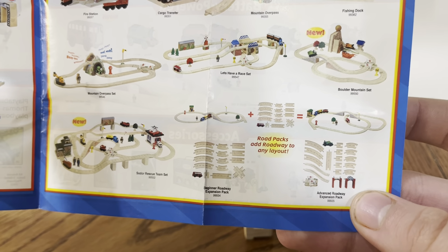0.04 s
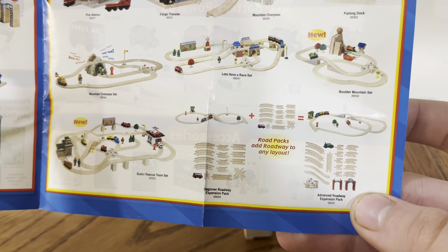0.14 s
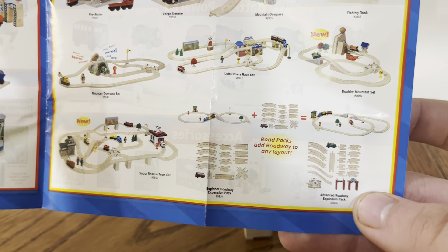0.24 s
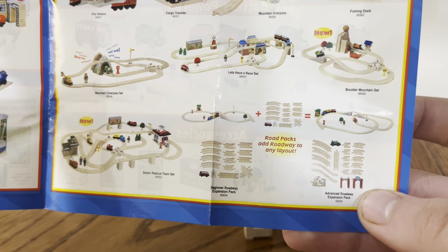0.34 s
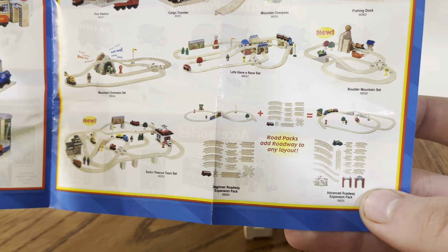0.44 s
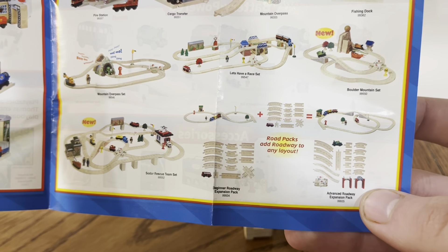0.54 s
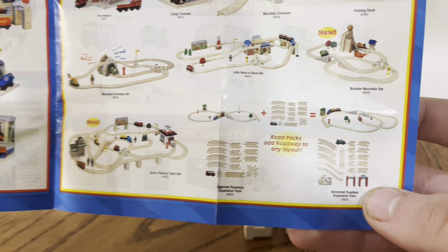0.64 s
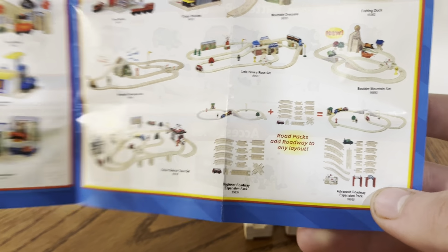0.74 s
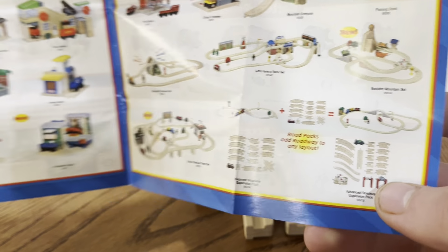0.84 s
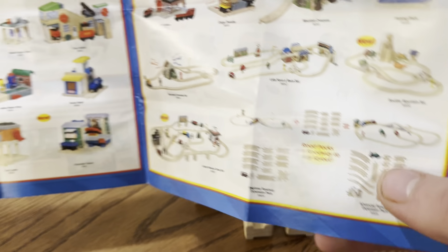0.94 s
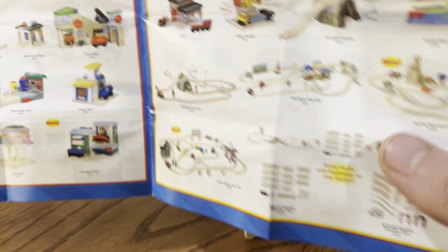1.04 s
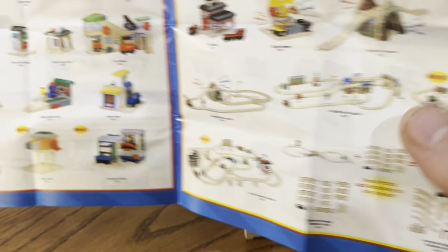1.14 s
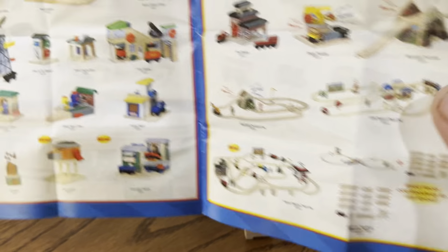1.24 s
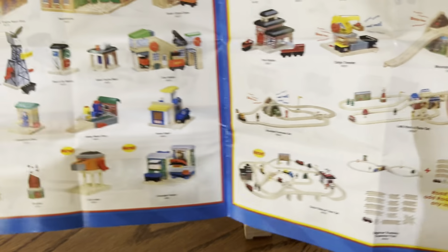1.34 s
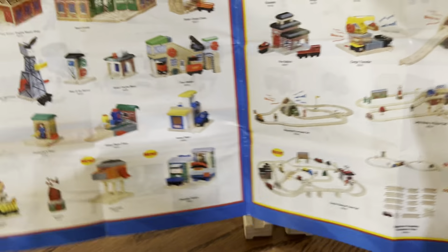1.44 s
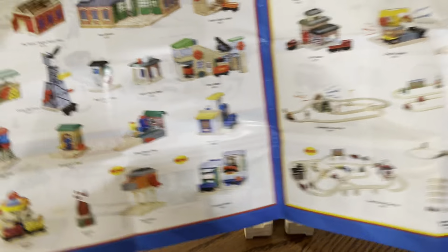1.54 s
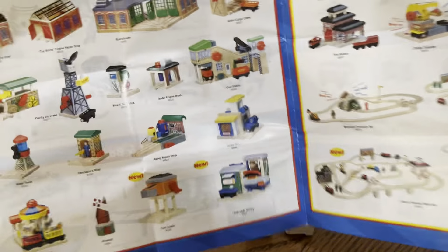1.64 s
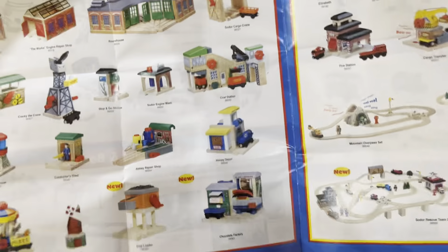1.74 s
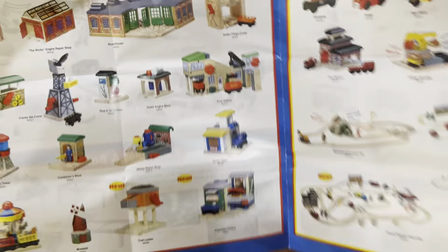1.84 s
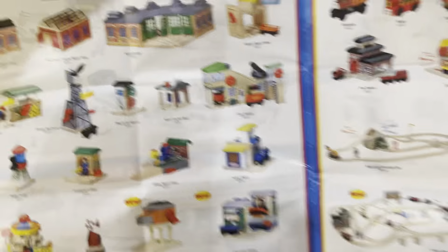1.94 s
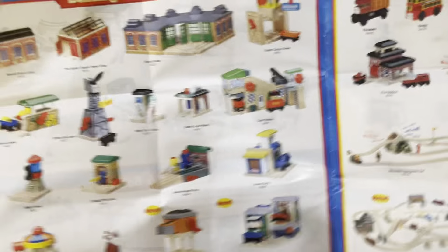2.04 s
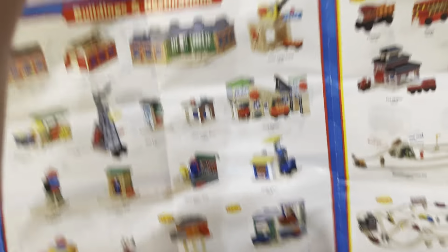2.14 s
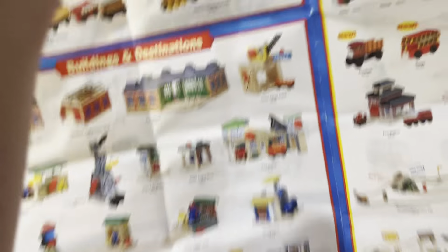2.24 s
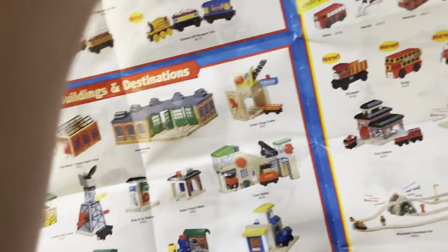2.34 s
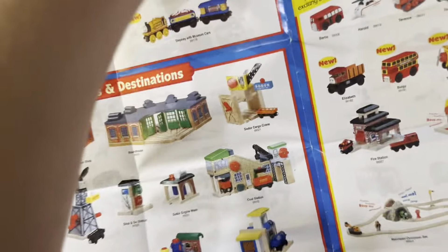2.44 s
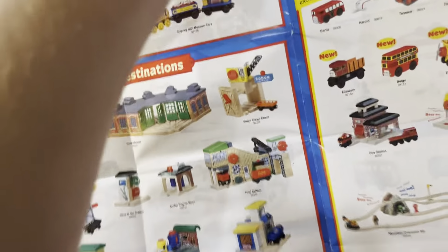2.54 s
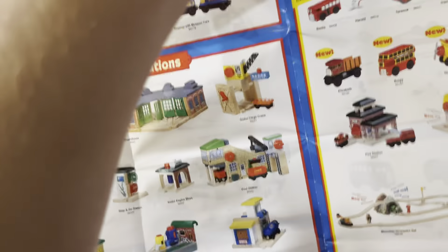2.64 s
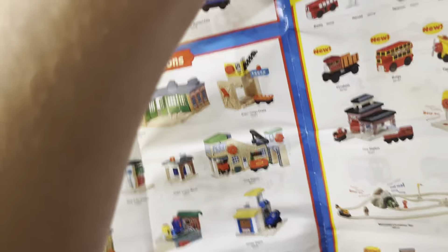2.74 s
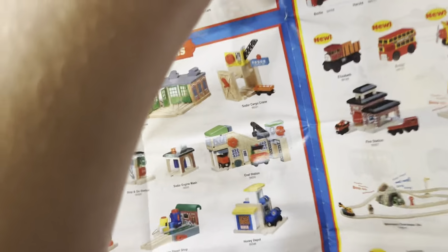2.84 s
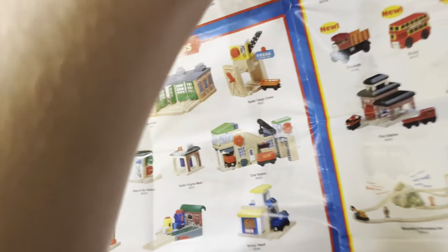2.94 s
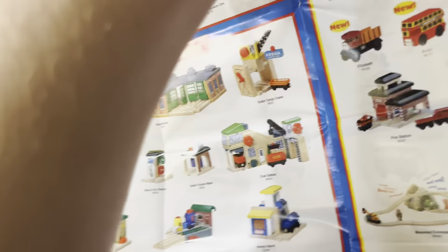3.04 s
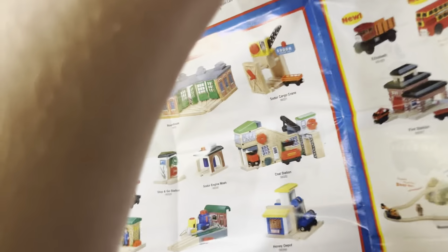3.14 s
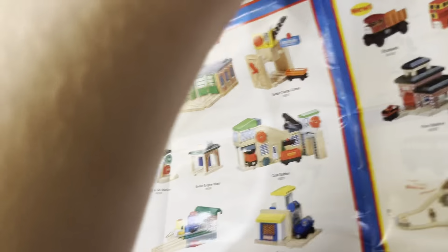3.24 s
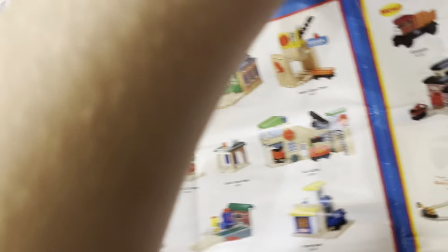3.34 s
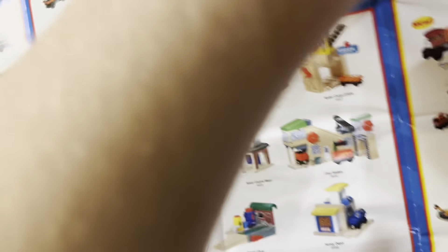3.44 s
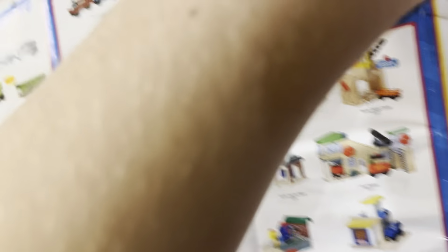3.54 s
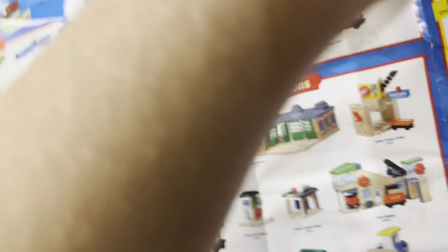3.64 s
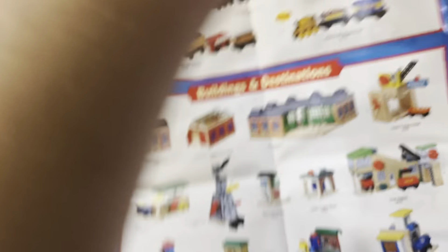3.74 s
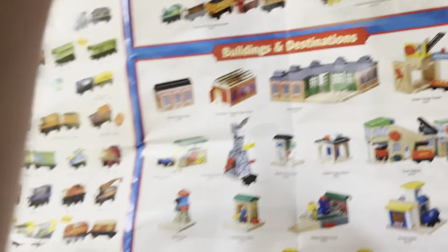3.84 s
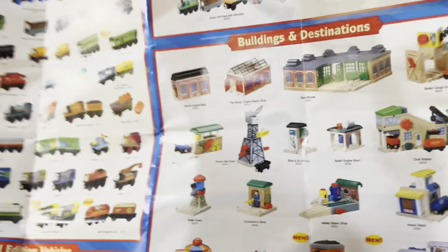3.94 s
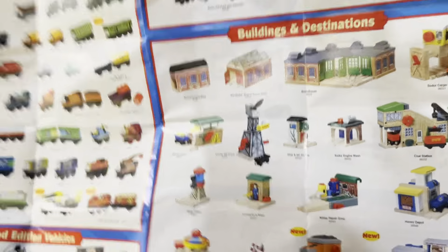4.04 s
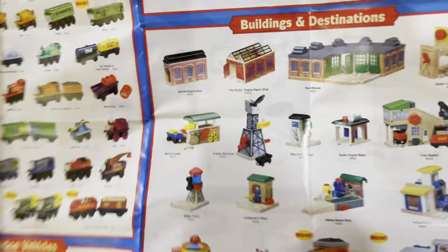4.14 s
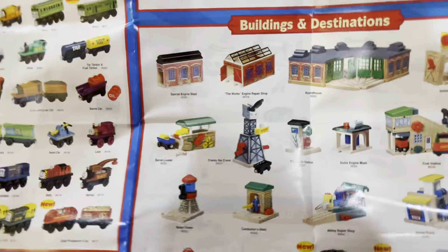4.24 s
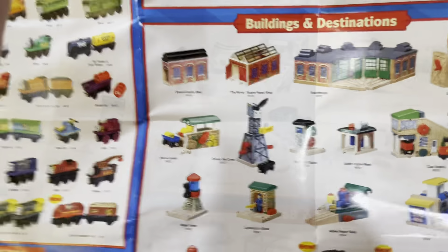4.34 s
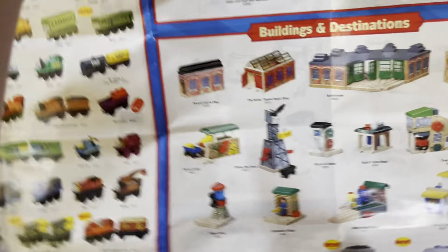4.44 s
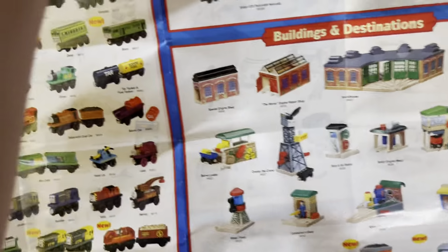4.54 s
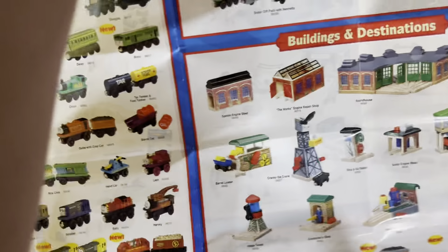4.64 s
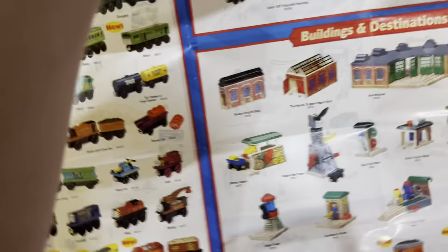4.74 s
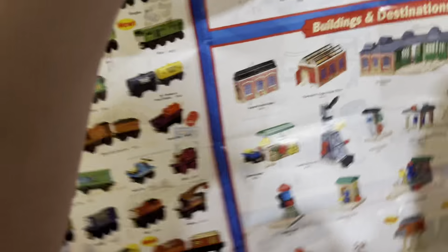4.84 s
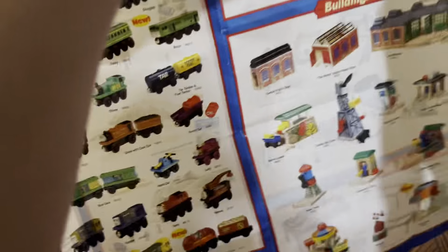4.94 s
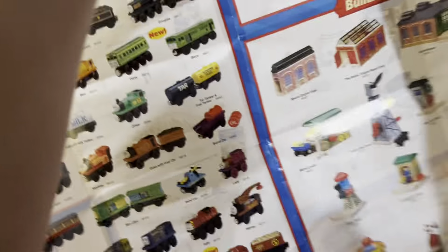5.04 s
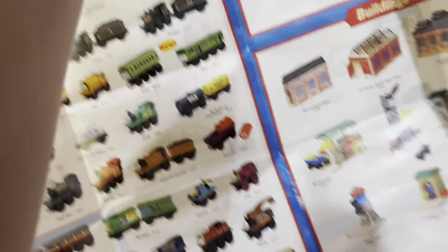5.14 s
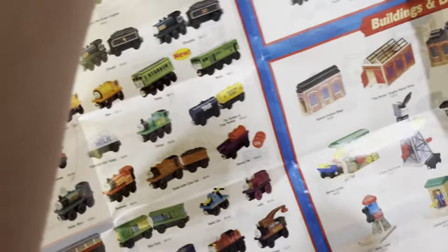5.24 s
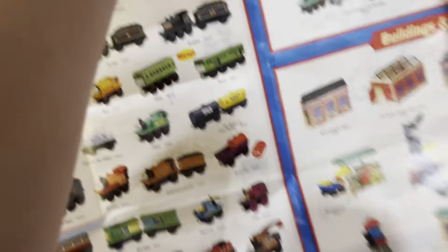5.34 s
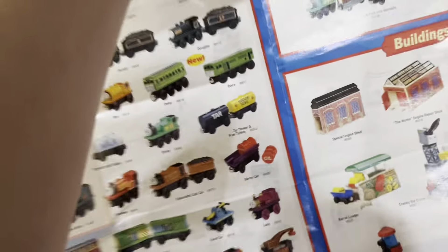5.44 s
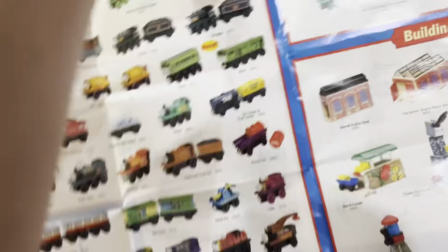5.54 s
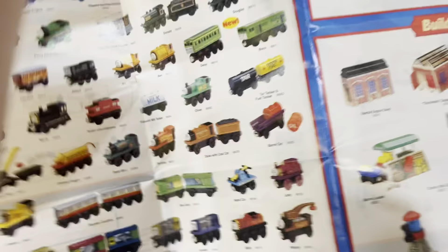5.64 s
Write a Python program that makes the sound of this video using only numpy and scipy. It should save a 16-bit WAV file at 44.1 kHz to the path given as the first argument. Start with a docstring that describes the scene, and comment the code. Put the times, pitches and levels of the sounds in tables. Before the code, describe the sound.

A tiny thin squeak of paper at the very start dies at once, leaving faint room tone for over half a second. Then a large glossy folded sheet is moved by hand: rustling, crinkling, sharp crease snaps, dull hollow pops and low air-pushing flaps continue irregularly to the end. Close stereo microphone, small quiet room, very little reverberation.

```python
"""A large folded leaflet of glossy paper is opened out and handled close by in a quiet room, over filtered-noise tone.
0 s: a thin squeak, noise through narrow resonances. 0.27 s: a faint lone crease snap, octave bands of noise and tone.
From 0.7 s to the end: snaps go on; grains rustle in sway, crackle and slide; panels flap in low decaying modes;
free edges flick in falling chirps; bulges pop with a crunch and gliding modes.
Two closely spaced microphone ports hear it all, with a short, faint room of sparse reflections behind."""
import sys
import numpy as np
from scipy import signal
from scipy.fft import rfft, irfft
from scipy.io import wavfile
from scipy.ndimage import map_coordinates

SR = 44100
rng = np.random.default_rng(int(sys.argv[2]) if len(sys.argv) > 2 else 0)


def output_pcm(signal):
    """Save a mono or channel-first signal as 16-bit PCM at the path in sys.argv[1].

    Samples are clipped to [-1, 1] before scaling.
    """
    pcm = np.clip(np.atleast_2d(signal).T, -1, 1) * 32767
    wavfile.write(sys.argv[1], SR, np.round(pcm).astype(np.int16))


N = 250793

# Thin squeak of the paper. Each row: time in seconds, level in dB.
SQUEAK_S_DB = [(0, -42), (.003, -45.5), (.035, -50.5), (.048, -61.5), (.075, -68), (.11, -109)]
# Squeak resonances. Each row: frequency in Hz, half-width in Hz, relative level in dB.
SQUEAK_MODES = [(1538, 63, 10), (1150, 200, 1), (430, 250, 0.5), (2050, 130, -5.5), (2830, 500, -10),
                (4100, 300, -12.5), (5500, 770, -17.5)]
# Sharp snaps of creases. Each row: start in seconds, relative octave level at 1.3 kHz in dB, body, bite and
# sparkle in dB relative to it, length in seconds, ring of the facet beside it in Hz.
SNAPS = [(0.2667, -75.5, -3, 3, 3.5, .0007, 3740), (.711, -77.5, 12.5, 10, 10, 0.00081, 3600),
         (0.737, -58.5, -1.5, -13, 4.5, 0.0018, 3550), (0.755, -55, -4, 0, -48, .0015, 1900),
         (0.9651, -39.5, -3, -4.5, -46, 0.0012, 430), (1.299, -47, 1, 1, -23, 0.0047, 1250),
         (1.5517, -39, -3, -1, -24.5, 0.0021, 1340), (1.593, -41.5, 7, 5, -8.5, 0.0017, 1410),
         (1.661, -62, 15.5, 5, -12, 0.0012, 885), (1.738, -43, -27, -6.5, -45, 0.0018, 1640),
         (1.816, -44, 2, -3, -2, .006, 2470), (1.8653, -35, 0, -1.5, -10.5, 0.003, 1320),
         (1.9694, -41.5, 2.5, -7, -7.5, 0.0016, 2360), (2.09, -51.5, 0, -10, -11, 0.0011, 900),
         (2.1, -41.5, -4, -3, -20, 0.0088, 1200), (2.1084, -40.5, -12, 6.5, 11.5, .0004, 2370),
         (2.166, -34, -20, -3, -1.5, 0.00022, 2300), (2.1915, -28.5, -8.5, -9, -21, 0.0041, 600),
         (2.289, -48, 1.5, -13, -0.5, .0035, 2960), (2.473, -50, -0.5, 0, -32, .004, 920),
         (2.69, -47, -1, -1, -17, .0082, 2320), (2.7417, -33.5, -7, 1.5, -1.5, 0.00033, 2490),
         (3.058, -43.5, 1.5, -24, -13, 0.022, 770), (3.388, -38.5, -0.5, 3, -18.5, 0.0033, 684),
         (3.723, -43, -11, -2, -15.5, 0.002, 1390), (4.0523, -32.5, 0, -3.5, -5, 0.0051, 1330),
         (4.1525, -55, -5, -7, -0.5, 0.0042, 1600), (4.378, -54.5, 1, -7, -43, 0.00068, 1500),
         (4.564, -43, 4, -4.5, -28, 0.0058, 2400), (5.0235, -50.5, 8, -7, -40, 0.0007, 2370),
         (5.397, -36, -6, -6, -5.5, 0.0027, 810), (5.5764, -46, 0, -7, -16, 0.0042, 910)]
# Where body, level, bite and sparkle apply, in Hz.
SNAP_HZ = [420, 1320, 4300, 10800]
# Bends of the sheet by the hands. Each row: start in seconds, length in seconds, crackle drive in dB,
# sway drive in dB, both before the layer gains.
BENDS = [(0.756, 0.043, -49, -52), (1.287, 0.018, -44, -43), (1.465, 0.045, -44, -50),
         (1.546, 0.13, -54, -39.5), (1.703, 0.0067, -34, -55), (1.803, 0.092, -41, -42.5),
         (1.97, 0.085, -54, -42.5), (2.089, 0.026, -36, -54), (2.18, 0.033, -32.5, -36.5),
         (2.271, 0.067, -41.5, -42), (2.486, 0.072, -49.5, -40.5), (2.673, 0.039, -38, -39.5),
         (2.984, 0.049, -42.5, -54), (3.195, 0.032, -39.5, -43), (3.353, 0.019, -39, -42.5),
         (3.533, 0.21, -45.5, -46), (4.007, 0.12, -46, -40.5), (4.32, 0.1, -45.5, -48),
         (4.461, 0.01, -38.5, -41), (4.557, 0.058, -41, -39.5), (4.757, 0.054, -46.5, -42),
         (4.88, 0.028, -44, -43.5), (4.986, 0.035, -44, -38), (5.292, 0.12, -42, -36),
         (5.479, 0.13, -42, -50), (5.622, 0.017, -67, -35)]
# Slips of the paper over skin. Each row: start in seconds, length in seconds, drive in dB before the layer gain.
SLIPS = [(.725, 0.051, -67), (1.07, 0.21, -70.5), (1.298, 0.0062, -56), (1.8, 0.15, -58),
         (2.115, 0.13, -48.5), (2.28, 0.0087, -48.5), (2.475, 0.019, -55), (2.745, 0.045, -54),
         (2.955, 0.0038, -63), (3.062, 0.047, -52), (3.22, 0.03, -61.5), (3.356, 0.029, -59.5),
         (3.57, 0.08, -53.5), (3.72, 0.066, -54), (4.26, 0.065, -57), (4.48, 0.005, -47.5),
         (4.875, 0.029, -53.5), (4.98, 0.047, -53), (5.07, 0.013, -66), (5.295, 0.13, -51.5),
         (5.48, 0.19, -54)]
# Restlessness of the hands, astir between bends and slips. Each row: time in seconds, relative drive in dB.
RESTLESS_S_DB = [(.69, -35), (.86, -23), (.93, 2), (1.1, -7.5), (1.41, -5), (1.72, 3.5), (2.06, -1.5),
                 (2.33, 2.5), (2.62, 2), (2.9, 0.5), (3.15, 3.5), (3.31, -31), (3.42, -2), (3.95, -0.5),
                 (4.15, 3), (4.64, 7.5), (4.7, -8), (4.77, 2.5), (4.82, -11), (4.88, -2.5), (5.14, 7.5),
                 (5.68, -11)]
# Rustle spectra. Each row: frequency in Hz, relative density in dB per Hz.
SWAY_HZ_DB = [(20, -77), (40, 1), (65, 9), (110, -1), (200, -10.5), (400, -59), (1000, -79)]
CRUMPLE_HZ_DB = [(80, -7.5), (180, 2.5), (400, 8.5), (1000, -16), (2600, -18), (5000, -23), (9000, -36.5),
                 (16000, -72.5)]
SLIDE_HZ_DB = [(300, 3.5), (1500, 8), (3000, 3), (4500, -0.5), (6000, -0.5), (9000, -2), (12000, -3.5),
               (14000, -13.5), (16000, 8.5)]
# Flaps of whole panels. Each row: start in seconds, relative peak in dB, nominal pitch in Hz.
FLAPS = [(0.741, -43.5, 59.5), (0.966, -40.5, 124), (1.059, -40.5, 63), (1.302, -42, 110), (1.521, -28, 79),
         (1.558, -26, 101), (1.832, -28.5, 73), (2.09, -22.5, 116.3), (2.111, -25, 70),
         (2.466, -22.5, 67.8), (2.745, -30.5, 116.5), (2.998, -31.5, 127), (3.621, -29.5, 79),
         (4.03, -33, 104), (4.332, -29.5, 135), (4.566, -22, 135.7), (4.866, -28, 227.3), (4.905, -29, 74),
         (4.989, -31.5, 69), (5.294, -23.5, 99.7), (5.4, -24.5, 75), (5.616, -23, 74)]
# Modes of a panel. Each row: multiple of its pitch, relative level in dB.
PANEL_MODES = [(0.998, 1.5), (1.55, -3.5), (2.399, -8), (3.7, -7)]
# Flicks of a free edge. Each row: start in seconds, relative level in dB, first pitch in Hz, last pitch in Hz,
# glide and decay time in seconds.
FLICKS = [(.7585, -50, 900, 380, .005), (.8225, -47, 2400, 580, .005), (3.002, -42, 1633, 280, 0.00306),
          (4.6315, -39.5, 1000, 400, .004), (5.2865, -43, 900, 250, .005), (5.6555, -33.5, 2500, 650, .005)]
# Dull pops of bulges turning inside out. Each row: start in seconds, relative level in dB, nominal pitch in Hz,
# length in seconds.
POPS = [(0.7696, -47.5, 1255, 0.0051), (1.199, -46.5, 430, 0.0052), (1.469, -48, 793, 0.0038),
        (1.704, -52, 630, 0.00093), (1.726, -48, 520, 0.0026), (1.827, -38.5, 430, 0.0028),
        (1.846, -40, 1150, 0.0017), (1.903, -44.5, 484, 0.0062), (2.234, -45, 1130, 0.0024),
        (2.326, -49.5, 1165, 0.0015), (2.668, -50, 646, 0.0055), (2.715, -38.5, 1730, 0.0099),
        (2.961, -48.5, 1305, 0.0078), (3.198, -36, 905, 0.0013), (3.2037, -36.5, 866, 0.002),
        (3.228, -41.5, 590, 0.0041), (3.254, -47, 978, 0.00062), (3.349, -49, 570, 0.01),
        (3.362, -40.5, 1084, 0.0061), (3.606, -43, 1238, 0.0034), (3.696, -39, 1293, 0.00034),
        (3.8395, -44, 409, 0.016), (4.0286, -44.5, 900, 0.025), (4.079, -47, 398, 0.0015),
        (4.125, -50, 485, 0.0008), (4.229, -45.5, 1240, 0.0043), (4.32, -47.5, 907, 0.0037),
        (4.401, -45, 938, 0.0013), (4.451, -42.5, 1036, 0.0016), (4.4562, -38.5, 1197, 0.015),
        (4.4746, -39.5, 760, 0.0049), (4.531, -49, 1386, 0.0086), (4.545, -45, 1150, 0.0053),
        (4.7477, -48.5, 1600, 0.0012), (4.763, -45, 1150, 0.0038), (4.864, -50.5, 430, 0.0031),
        (4.915, -51, 1150, 0.0021), (4.964, -45, 794, 0.0039), (5.326, -45, 954, 0.0067),
        (5.479, -39, 960, 0.011), (5.55, -47, 1052, 0.0016), (5.626, -37, 520, 0.008)]
# Crunch spectrum. Each row: multiple of its pitch, relative level in dB per octave.
CRUNCH_SPECTRUM = [(.125, -9.5), (.5, 2), (1, 4.5), (2, -7.5), (4, -5.5), (16, -53)]
# Modes of a bulge. Each row: multiple of its pitch, relative level in dB.
BULGE_MODES = [(0.454, -6), (0.999, -1.5), (1.55, -7), (2.25, -6.5)]
# Still room tone. Each row: frequency in Hz, relative density in dB per Hz.
ROOM_TONE_HZ_DB = [(20, 6.5), (70, 7), (400, -9.5), (1000, -18.5), (4000, -29), (16000, -35)]
# Room decay. Each row: frequency in Hz, t60 in seconds.
ROOM_T60_HZ_S = [(100, 0.34), (1500, 0.13), (15000, 0.014)]
# Sameness of the two ports. Each row: frequency in Hz, likeness from 0 to 1.
LIKENESS = [(60, 0.975), (300, 0.9), (800, 0.65), (1400, 0.3), (2100, 0.55), (3000, 0.95), (4400, 0.97),
            (5600, 0.5), (6600, 0.99)]
# Phase between ports. Each row: frequency in Hz, lead of the left in radians.
LEAD_HZ_RAD = [(0, 0), (1000, 0), (1500, -1.2), (1900, .2), (3400, 1), (5000, .5), (5800, -.8),
               (7000, -1.7), (8400, -3.14), (11500, -6.1), (12800, -6.7), (15500, -9.4)]
# Port balance. Each row: frequency in Hz, left minus right in dB.
BALANCE_HZ_DB = [(60, 0.5), (200, 3), (700, 2.5), (1400, -0.5), (2600, 4), (8000, 0)]
# Where the paper is being worked, on top of the balance. Each row: time in seconds, left minus right in dB.
PLACE_S_DB = [(0, 1.5), (1.3, 0.5), (2.7, -0.5), (3.3, -1), (4.1, 0), (5, -1)]
# Colour of the microphone. Each row: frequency in Hz, gain in dB.
PRESENCE_HZ_DB = [(550, 0.64), (740, -5.5), (950, 1.36), (1700, -2.23), (2350, 1.6), (3100, 0), (4300, 3.5),
                  (6800, 2)]

BEND_RISE_DB_PER_S, CRACKLE_FALL_DB_PER_S, SWAY_FALL_DB_PER_S = 745, 231, 107
SLIP_RISE_DB_PER_S, SLIP_FALL_DB_PER_S = 509, 336
# drives of the stirring at 0 dB of restlessness, before the layer gains
STIR_SWAY_DB, STIR_CRACKLE_DB, STIR_HISS_DB = -59, -57.5, -66.5
EDGE_HZ = 15900
# centres of the octave bands in which bending waves travel
OCTAVE_HZ = 180 * 2. ** np.arange(7)
TIME_S = np.arange(N) / SR
BIN_HZ = np.fft.rfftfreq(N, 1 / SR)


def amp(db):
    """Decibels to gain."""
    return 10 ** (np.asarray(db) / 20)


def unit(x):
    """Scales to rms 1."""
    return x / np.sqrt(np.mean(x ** 2) + 1e-20)


def read(points, hz):
    """Reads a curve on a log-frequency axis."""
    f_hz, value = np.transpose(points)
    return np.interp(np.log(hz + 1), np.log(f_hz + 1), value)


def level(rows):
    """Gain over time from a dB curve; -120 dB before its start."""
    s, db = np.transpose(rows)
    return amp(np.interp(TIME_S, s, db, left=-120))


def colour(x, points):
    """Filters by a spectrum, to rms 1."""
    return unit(irfft(rfft(x) * amp(read(points, BIN_HZ)), N))


def add(mix, start_s, sound):
    """Mixes a two-channel sound in at its start time."""
    part = mix[:, max(round(start_s * SR), 0):][:, :sound.shape[1]]
    part += sound[:, :part.shape[1]]


def blow(x):
    """Scales each channel of a short sound to the energy of 20 ms at rms 1."""
    return x / np.sqrt((x ** 2).sum(1, keepdims=True) / (.02 * SR))


def room_tone(gain_db=-72):
    """The still room: steady noise, strongest in the bass."""
    return amp(gain_db) * colour(rng.standard_normal((2, N)), ROOM_TONE_HZ_DB)


def squeak(glide_per_s=0.63):
    """Friction sets narrow resonances of the paper singing briefly, rising a little as the sheet tightens."""
    response = sum(amp(db) / np.sqrt(width_hz) / (1 + 1j * (BIN_HZ - hz) / width_hz) ** 2
                   for hz, width_hz, db in SQUEAK_MODES)
    sung = unit(irfft(rfft(rng.standard_normal((2, N))) * response, N))
    # reading ever faster until the last row raises the pitch
    read_at = np.cumsum(1 + glide_per_s * np.minimum(TIME_S, SQUEAK_S_DB[-1][0]))
    risen = np.array([map_coordinates(channel, [read_at], order=3) for channel in sung])
    return risen * level(SQUEAK_S_DB)


def cascade(t_s, length_s, slips_per_s=1400, slip_s=0.0002, first=0.6):
    """Power of a crease that gives way in a quick run of slips, the first at once, and then stops short."""
    size = rng.exponential(1, len(t_s)) * (rng.random(len(t_s)) < slips_per_s / SR)
    size[0] = first
    run = size * np.exp(-(t_s / length_s) ** 2)
    return signal.lfilter([1], [1, -np.exp(-2 / (slip_s * SR))], run)


def buckle(octave_db, length_s, bass_lag=0.36, spread_s=0.0013, rise_s=0.00049,
           ring_db=-18.0, ring_s=0.015, ring_tilt_db=-6.0, facet=0.37, facet_cycles=5, bass_db=-6):
    """Paper buckles octave by octave: slower bending waves draw out the bass, and nearby facets ring briefly."""
    t_s = np.arange(4096) / SR
    out = np.zeros((2, len(t_s)))
    slips = cascade(t_s, max(length_s, .0003))
    # small creases radiate little bass
    octave_db = octave_db + bass_db * (OCTAVE_HZ == OCTAVE_HZ[0])
    for hz, band_db in zip(OCTAVE_HZ, octave_db):
        edges_hz = [hz / np.sqrt(2), hz * np.sqrt(2)]
        band = signal.butter(2 if hz < 1000 else 3, edges_hz, "band", fs=SR, output="sos")
        slow = (2500 / hz) ** bass_lag
        ring_gain = amp(ring_db + ring_tilt_db * abs(np.log2(hz / 2000)))
        ring = ring_gain * np.exp(-t_s / (ring_s * np.sqrt(slow)))
        wave = (1 - np.exp(-t_s / rise_s)) * (np.exp(-t_s / (spread_s * slow)) + ring)
        shape = np.sqrt(abs(signal.fftconvolve(slips, wave ** 2)[:len(t_s)]))
        # facet sizes vary: each octave draws its own pitch, clearest in the low ones
        tone_hz = hz * 2 ** (rng.random() - .5)
        tone = np.sin(2 * np.pi * (tone_hz * t_s + rng.random((2, 1))))
        tone *= np.exp(-t_s * hz / (2 * facet_cycles))
        hiss = rng.standard_normal((2, len(t_s))) * np.sqrt(SR / 2 / hz)
        source = hiss + 2 * facet * np.sqrt(slow) * tone
        out += amp(band_db) * blow(signal.sosfilt(band, source * shape))
    return out


def between_folds(x, bounce=0.33, trip_s=0.0010767):
    """Bending waves run to and fro between two folds, the low ones slower: uneven resonances, new each time."""
    size = x.shape[1]
    hz = np.fft.rfftfreq(size, 1 / SR)
    trip_s = trip_s * 2 ** rng.uniform(-0.5, 0.501)  # round trip at 2 kHz
    turn = np.exp(-4j * np.pi * trip_s * np.sqrt(2000 * hz))
    return irfft(rfft(x) * np.sqrt(1 - bounce ** 2) / (1 - bounce * turn), size)


def facet_ring(x, hz, ring_db=3.5, sharpness=7):
    """The stiff facet beside a crease rings at its own pitch."""
    return x + amp(ring_db) * signal.lfilter(*signal.iirpeak(hz, sharpness, fs=SR), x)


def snaps(gain_db=-0.82):
    """Stiff creases snap through, each with its own balance of body, bite and sparkle and its own ring."""
    out = np.zeros((2, N))
    for start_s, db, body_db, bite_db, sparkle_db, length_s, ring_hz in SNAPS:
        balance_db = np.interp(np.log(OCTAVE_HZ), np.log(SNAP_HZ), [body_db, 0, bite_db, sparkle_db])
        snap = between_folds(buckle(db + balance_db, length_s))
        add(out, start_s, amp(gain_db) * facet_ring(snap, ring_hz))
    return out


def strokes(rows, rise_db_per_s, fall_db_per_s, stir_db):
    """Gain of hand movements: each rises, holds and falls, over the varying stir of restless hands."""
    power = (amp(stir_db) * level(RESTLESS_S_DB)) ** 2
    for start_s, length_s, db in rows:
        before_s = np.maximum(start_s - TIME_S, 0)
        after_s = np.maximum(TIME_S - start_s - length_s, 0)
        near = before_s + after_s < .5
        stroke_db = db - rise_db_per_s * before_s[near] - fall_db_per_s * after_s[near]
        power[near] += amp(stroke_db) ** 2
    return np.sqrt(power)


def grains(per_s, spread_db, length_s):
    """Tiny noise bursts at random moments, most of them weak and a few strong."""
    size = amp(spread_db * np.minimum(rng.exponential(1, N), 3.5)) * (rng.random(N) < per_s / SR)
    power = signal.lfilter([1], [1, -np.exp(-2 / (length_s * SR))], size ** 2)
    return unit(np.sqrt(power) * rng.standard_normal((2, N)))


def flutter(x, depth_db=3.5, patch_hz=600, patch_s=.022):
    """The sheet keeps changing shape under the fingers: short-lived resonances come and go in its rustle."""
    hz, t_s, z = signal.stft(x, SR, nperseg=256)
    at = np.meshgrid(hz / patch_hz, t_s / patch_s, indexing="ij")
    patches = unit(map_coordinates(rng.standard_normal((128, 512)), at, order=3, mode="wrap"))
    return unit(signal.istft(z * amp(depth_db * patches), SR, nperseg=256)[1][:, :N])


def bulge(hz, length_s, taut=1.227, slack=0.79, relax_s=0.00528, cycles=3, rise_s=0.0003,
          ring_db=-19, ring_s=0.084, wave_db=-6, spread_s=0.00902, wave_s=0.018):
    """A bulge flips: modes glide down from taut to slack and ring faintly; a bending wave falls in pitch."""
    t_s = np.arange(2600) / SR
    turns = np.cumsum(hz * (slack + (taut - slack) * np.exp(-t_s / relax_s))) / SR
    ring = amp(ring_db) * np.exp(-t_s / ring_s)
    modes = np.zeros((2, len(t_s)))
    for k, db in BULGE_MODES:
        decay = np.exp(-t_s / (length_s / 2 + cycles / (k * hz)))
        modes += amp(db) * (decay + ring) * np.sin(2 * np.pi * (k * turns + rng.random((2, 1))))
    # the slow, low part of the wave arrives last
    falling_turns = np.cumsum(hz / (1 + t_s / spread_s)) / SR
    wave = amp(wave_db) * np.exp(-t_s / wave_s) * np.sin(2 * np.pi * (falling_turns + rng.random((2, 1))))
    return blow((modes + wave) * (1 - np.exp(-t_s / rise_s)) * (1 - t_s / t_s[-1]))


def crinkles(per_s=70, spread_db=14, low_hz=260, high_hz=2100, tilt_db_per_octave=-3.5):
    """Small facets flip one by one at uneven intervals, each a tiny bulge; on average the higher are fainter."""
    out = np.zeros((2, N))
    for k, (when, size, pitch) in enumerate(rng.random((int(per_s * N / SR), 3))):
        octave = pitch * np.log2(high_hz / low_hz)
        gain = amp(spread_db * size + tilt_db_per_octave * octave)
        add(out, (k + 2 * when) / per_s, gain * bulge(low_hz * 2 ** octave, 0))
    return unit(out)


def rustle(sway_db=-3.0, crackle_db=-9.0, crinkle_db=-6, slide_db=6.5):
    """Bends make the moving sheet sway, crackle and crinkle; slips over skin add the fine hiss of sliding."""
    start_s, length_s, crackling_db, swaying_db = np.transpose(BENDS)
    swaying = strokes(zip(start_s, length_s, swaying_db), BEND_RISE_DB_PER_S, SWAY_FALL_DB_PER_S, STIR_SWAY_DB)
    bending = strokes(zip(start_s, length_s, crackling_db),
                      BEND_RISE_DB_PER_S, CRACKLE_FALL_DB_PER_S, STIR_CRACKLE_DB)
    sliding = strokes(SLIPS, SLIP_RISE_DB_PER_S, SLIP_FALL_DB_PER_S, STIR_HISS_DB)
    sway = colour(rng.standard_normal((2, N)), SWAY_HZ_DB)
    crackle = flutter(colour(grains(per_s=240, spread_db=4.0, length_s=0.0019), CRUMPLE_HZ_DB))
    crumpling = amp(crackle_db) * crackle + amp(crinkle_db) * crinkles()
    slide = flutter(colour(grains(per_s=2000, spread_db=8.0, length_s=0.0086), SLIDE_HZ_DB), depth_db=2.0)
    return amp(sway_db) * sway * swaying + crumpling * bending + amp(slide_db) * slide * sliding


def flaps(gain_db=-0.27, rise_s=0.0064, sag=0.5, sag_s=0.0054, t60_s=0.074):
    """A panel swings over, pushing air, and wobbles in its low modes, sagging in pitch as it goes slack."""
    out = np.zeros((2, N))
    t_s = np.arange(SR // 3) / SR
    for start_s, db, hz in FLAPS:
        turns = np.cumsum(hz * (1 + sag * (np.exp(-t_s / sag_s) - .5))) / SR
        swing = np.zeros((2, len(t_s)))
        for k, mode_db in PANEL_MODES:
            decay = amp(mode_db - 60 * t_s * np.sqrt(k) / t60_s)
            swing += decay * np.sin(2 * np.pi * (k * turns + rng.random((2, 1))))
        swing *= 1 - np.exp(-(t_s / rise_s) ** 2)
        add(out, start_s, amp(db + gain_db) * swing / abs(swing).max(1, keepdims=True))
    return out


def crunch(hz, length_s):
    """Dull buckling, strongest around one pitch."""
    multiple, shape_db = np.transpose(CRUNCH_SPECTRUM)
    return buckle(np.interp(np.log(OCTAVE_HZ / hz), np.log(multiple), shape_db), length_s)


def soften(x, soft_hz=2800, leak_db=-17):
    """Gently curved paper gives off little treble."""
    dull = signal.ellip(N=4, rp=1, rs=40, Wn=soft_hz, fs=SR, output="sos")
    return signal.sosfilt(dull, x) + amp(leak_db) * x


def flicks(tail_db=-15, tail_s=.016, rise_s=.0005, crunch_db=-8):
    """An edge springs free: the bending wave's quick treble arrives first, slow bass last, over a little crunch."""
    out = np.zeros((2, N))
    t_s = np.arange(4096) / SR
    for start_s, db, first_hz, last_hz, length_s in FLICKS:
        fall = np.exp(-t_s / length_s)
        turns = np.cumsum(last_hz + (first_hz - last_hz) * fall) / SR
        shape = (1 - np.exp(-t_s / rise_s)) * (fall + amp(tail_db) * np.exp(-t_s / tail_s))
        chirp = blow(shape * np.sin(2 * np.pi * (turns + rng.random((2, 1)))))
        under = amp(crunch_db) * crunch(np.sqrt(first_hz * last_hz), length_s)
        add(out, start_s, amp(db) * (between_folds(chirp) + under))
    return soften(out)


def pops(crunch_db=-6, knock_db=-0.5, blur_db_per_s=400):
    """Larger bulges give way with a dull crunch and a hollow knock; the slower the pop, the weaker its knock."""
    out = np.zeros((2, N))
    for start_s, db, hz, length_s in POPS:
        add(out, start_s, amp(db + crunch_db) * crunch(hz, length_s))
        add(out, start_s, amp(db + knock_db - blur_db_per_s * length_s) * bulge(hz, length_s))
    return soften(out)


def facing_panel(x, share=0.13, delay_s=0.0015, drift_depth=0.312):
    """The facing panel throws the sound back; as the fold opens and closes, delay and colour drift at random."""
    knots_s = np.linspace(0, TIME_S[-1], 32)
    drift = np.interp(TIME_S, knots_s, rng.standard_normal(len(knots_s)))
    late_s = TIME_S - delay_s * np.exp(drift_depth * drift)
    echo = np.array([map_coordinates(channel, [late_s * SR], order=3) for channel in x])
    return (x + share * echo) / np.sqrt(1 + share ** 2)


def room(x, delay_s=0.0045, taps_per_s=3000):
    """Sparse reflections of random sign and size; the treble dies first."""
    size = SR // 2
    present = (rng.random((2, size)) < taps_per_s / SR) * (TIME_S[:size] > delay_s)
    taps = rng.standard_normal((2, size)) * present
    hz, t_s, z = signal.stft(taps, SR, nperseg=256)
    decay = amp(-60 * t_s / read(ROOM_T60_HZ_S, hz)[:, None])
    tail = signal.istft(z * decay, SR, nperseg=256)[1]
    return signal.fftconvolve(x, tail / np.linalg.norm(tail[0]), axes=1)[:, :N]


def ports(x):
    """The right port shares part of the left's wave, most where likeness is high, shifted by the path between."""
    left, other = rfft(x)
    same = np.clip(read(LIKENESS, BIN_HZ), 0, 1)
    right = (same * left + np.sqrt(1 - same ** 2) * other) * np.exp(-1j * read(LEAD_HZ_RAD, BIN_HZ))
    lean = amp(read(BALANCE_HZ_DB, BIN_HZ) / 2)
    return irfft(np.array([left * lean, right / lean]), N)


def scene(room_db=-19):
    """The leaflet close by, its reflections and the still room."""
    tone = room_tone()
    squeaking = squeak()
    creased = snaps() + rustle() + flicks() + pops()
    paper = squeaking + facing_panel(creased) + flaps()
    lean = np.sqrt(level(PLACE_S_DB))
    return ports(paper + amp(room_db) * room(paper) + tone) * np.array([lean, 1 / lean])


def record(dry, low_cut_hz=47):
    """The microphone's colour and low cut, then the band limit."""
    heard = irfft(rfft(dry) * amp(read(PRESENCE_HZ_DB, BIN_HZ)), N)
    thinned = signal.sosfilt(signal.butter(2, low_cut_hz, "high", fs=SR, output="sos"), heard)
    band_limit = signal.firwin(511, EDGE_HZ, window=("kaiser", 9), fs=SR)
    return signal.oaconvolve(thinned, band_limit[None], "same")


dry = scene()
out = record(dry)
output_pcm(out)
```